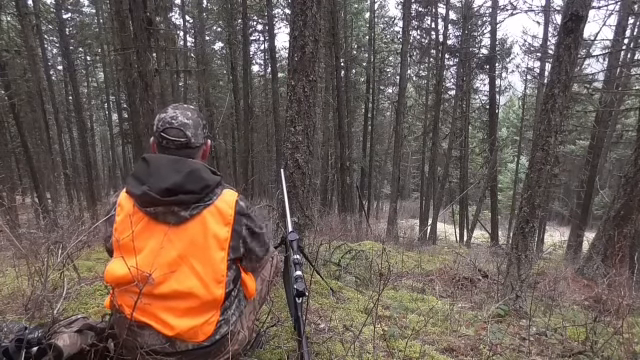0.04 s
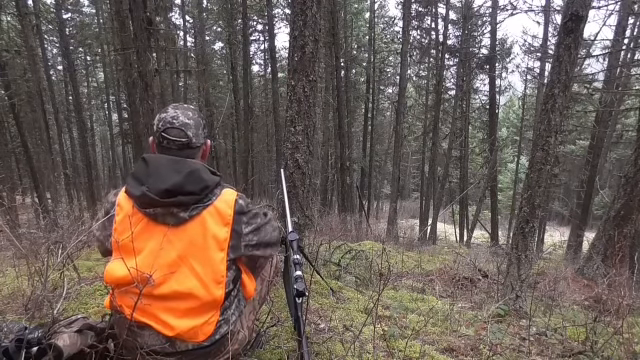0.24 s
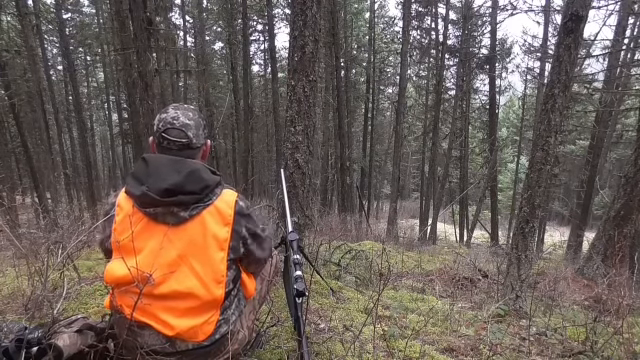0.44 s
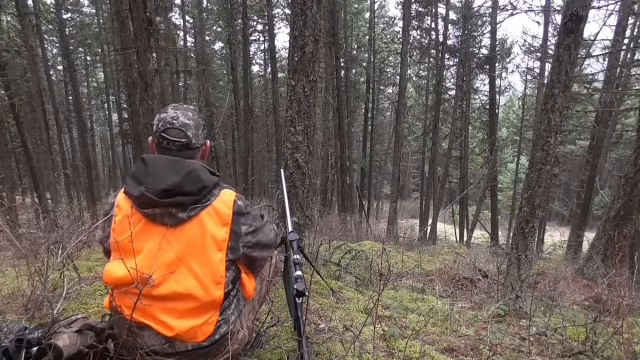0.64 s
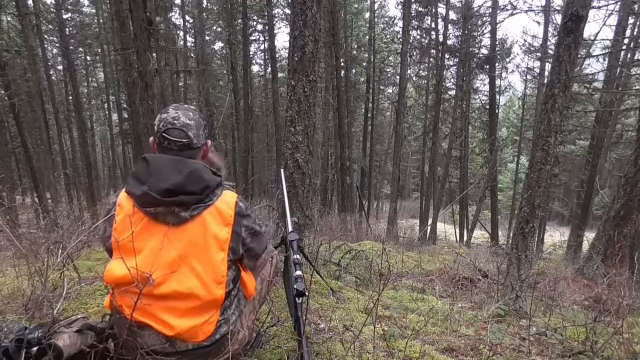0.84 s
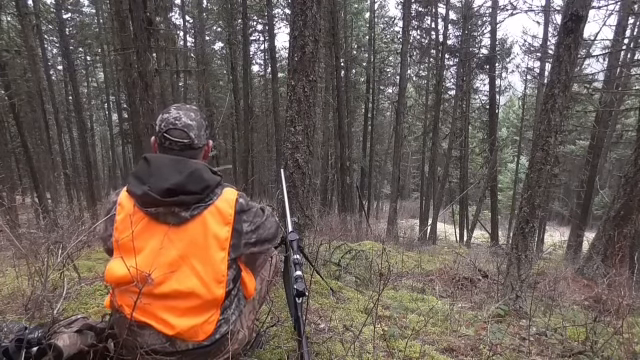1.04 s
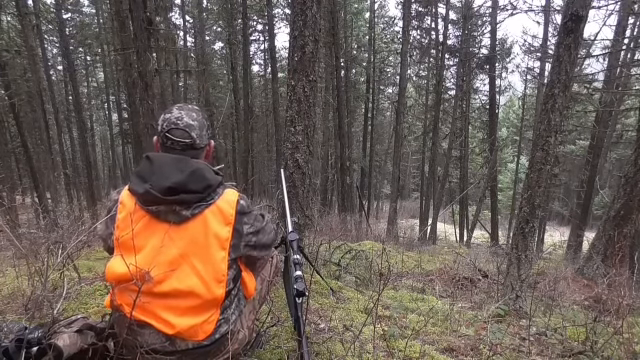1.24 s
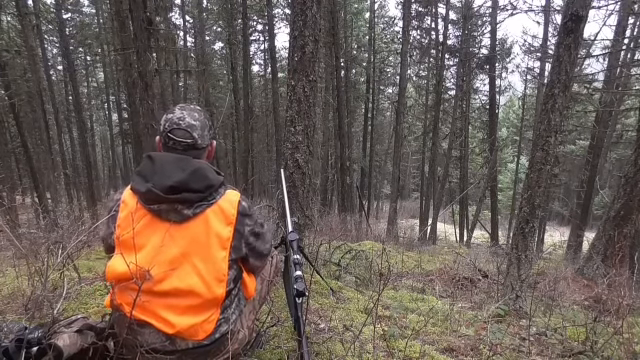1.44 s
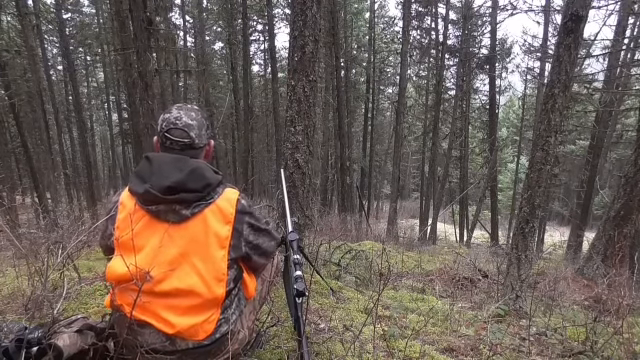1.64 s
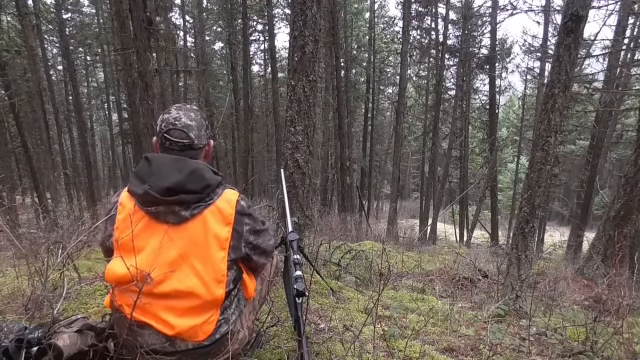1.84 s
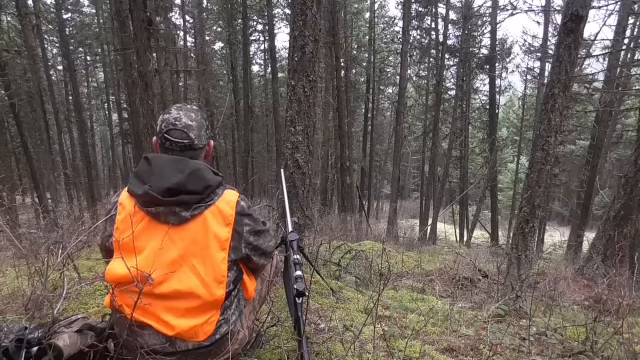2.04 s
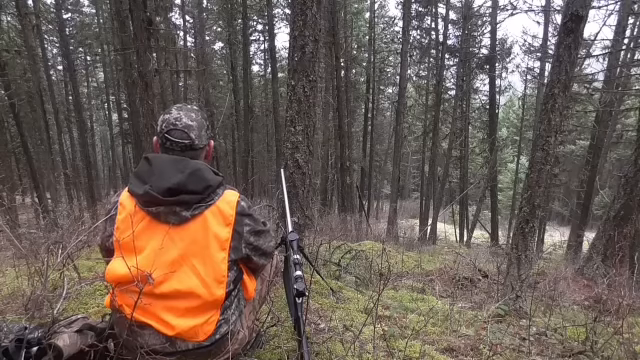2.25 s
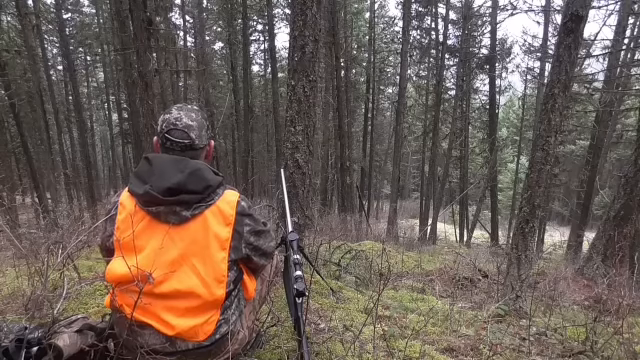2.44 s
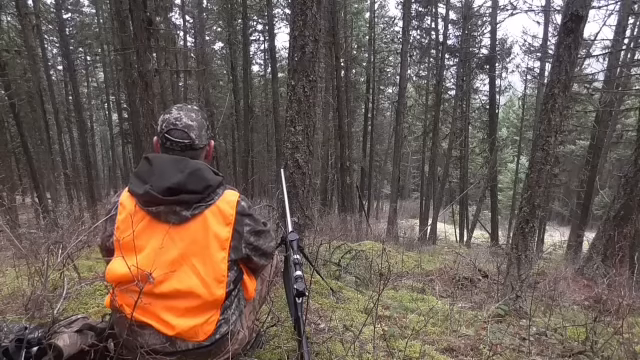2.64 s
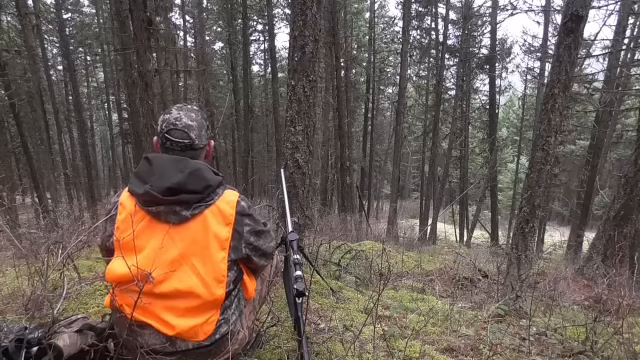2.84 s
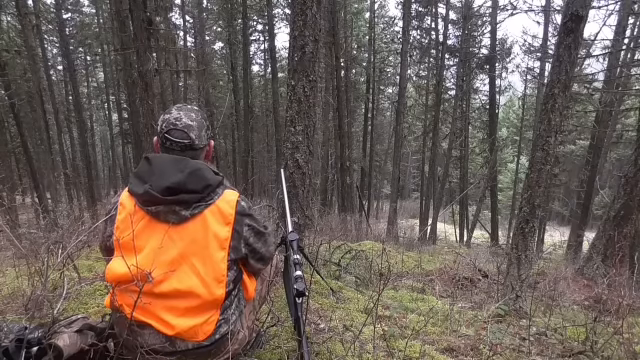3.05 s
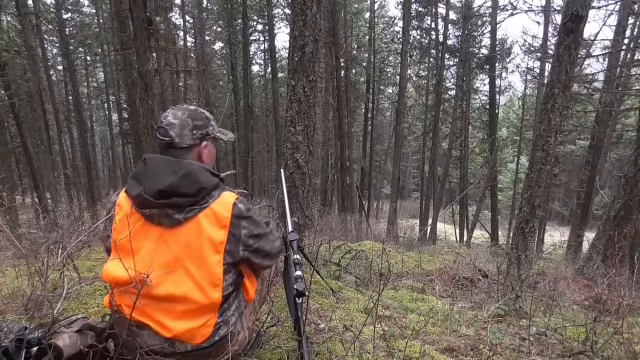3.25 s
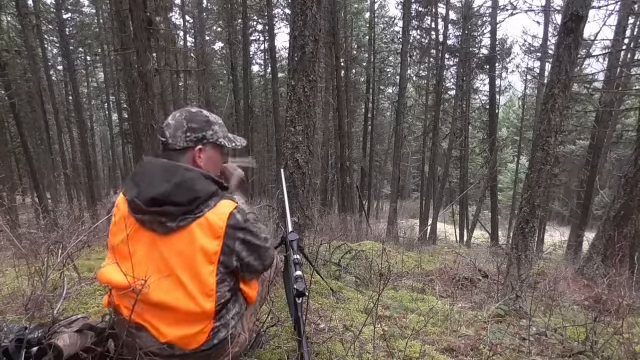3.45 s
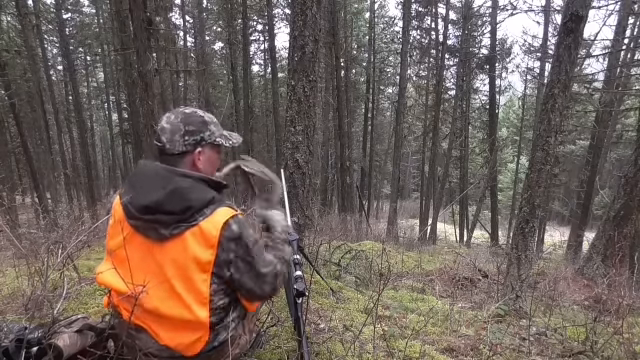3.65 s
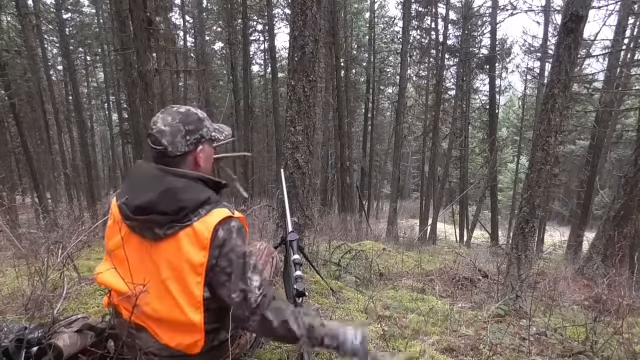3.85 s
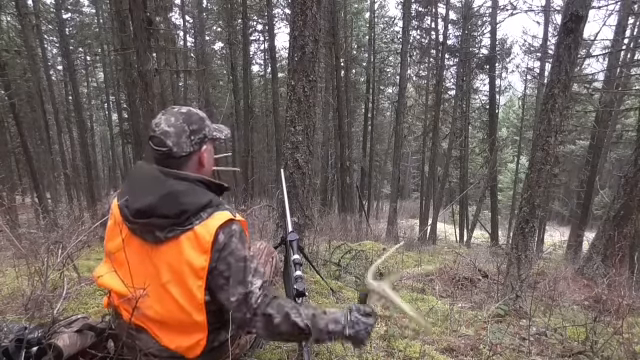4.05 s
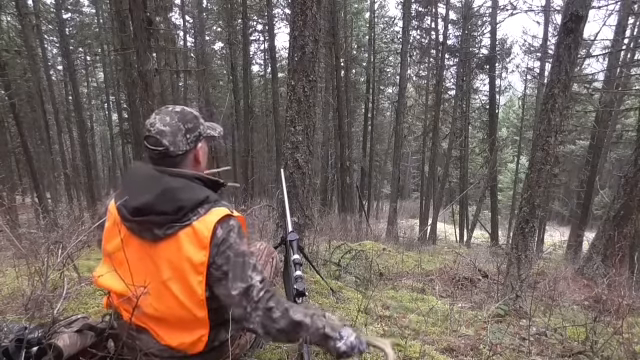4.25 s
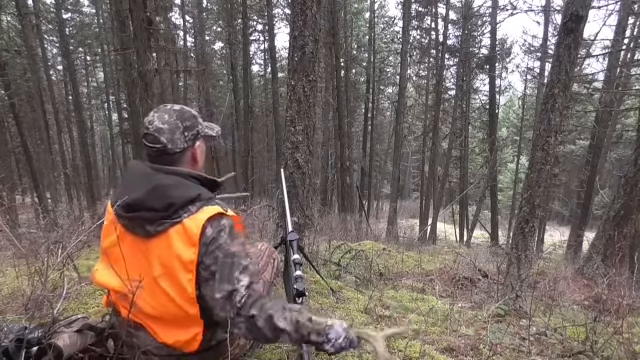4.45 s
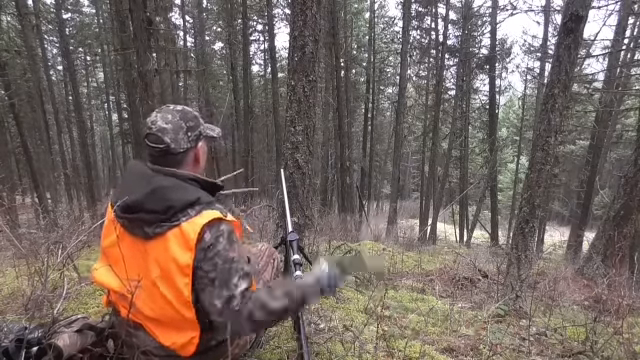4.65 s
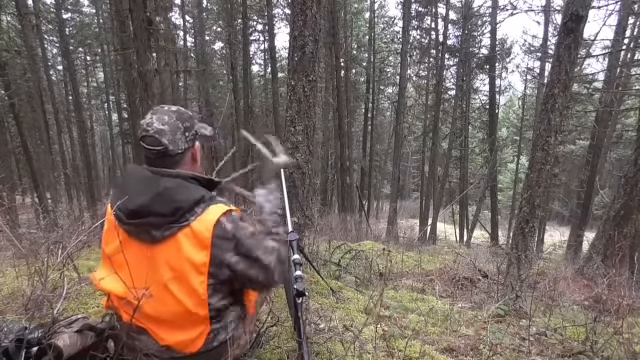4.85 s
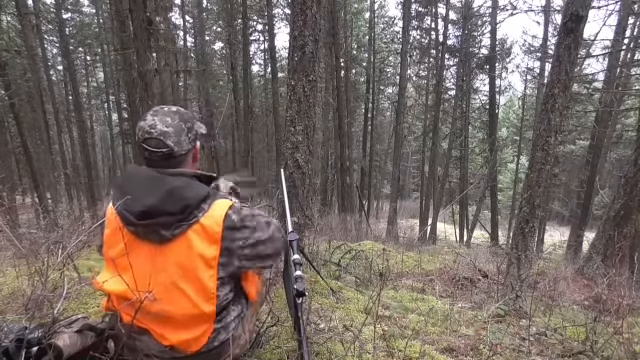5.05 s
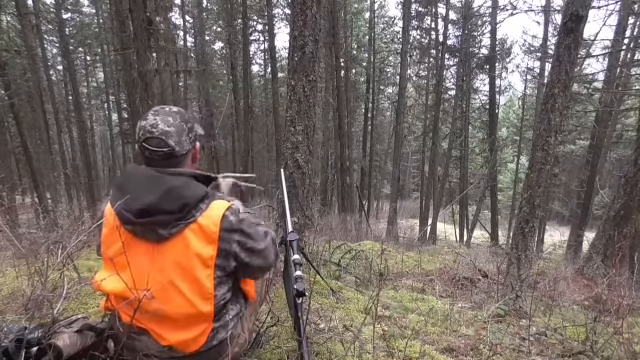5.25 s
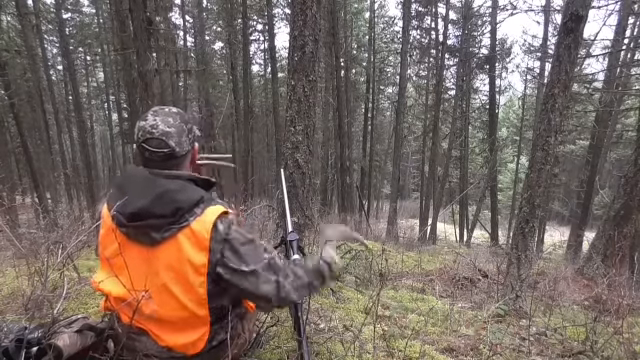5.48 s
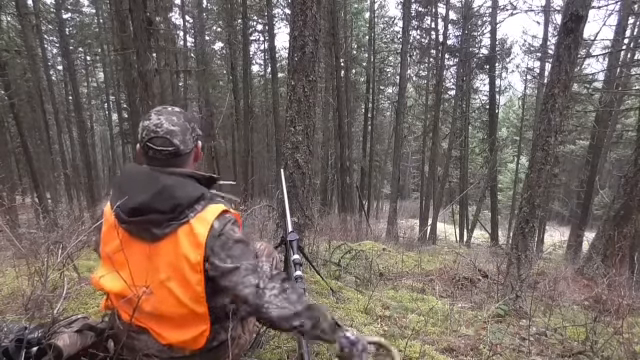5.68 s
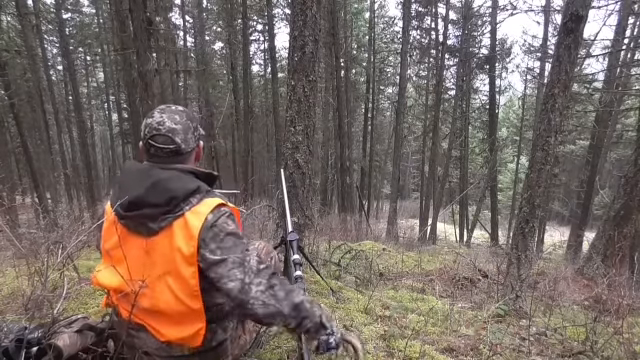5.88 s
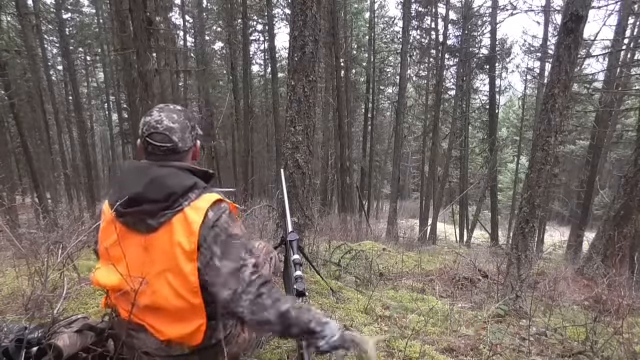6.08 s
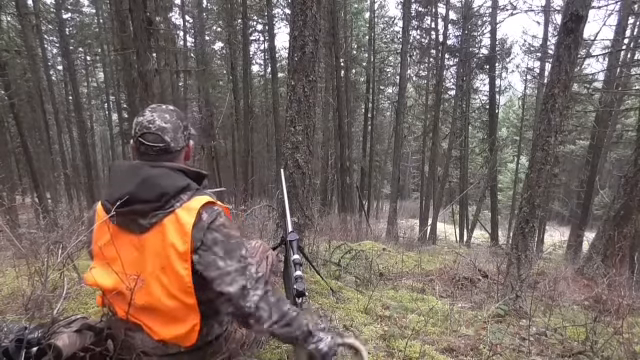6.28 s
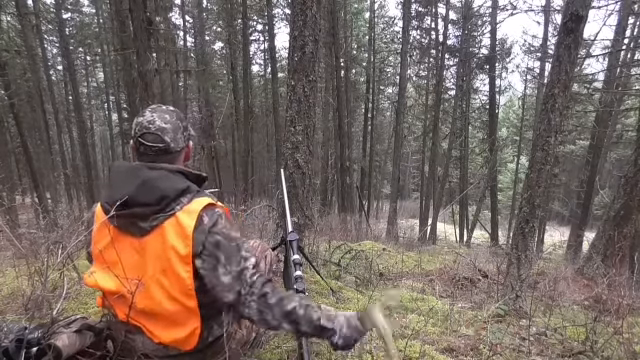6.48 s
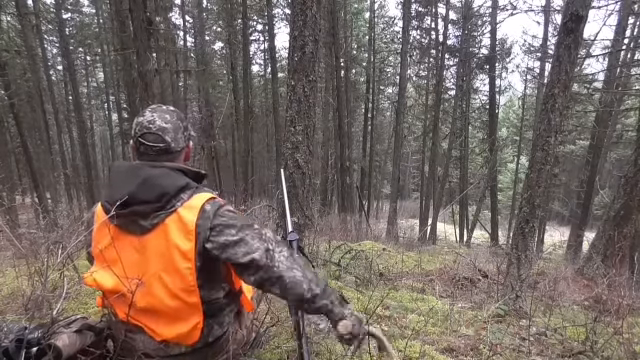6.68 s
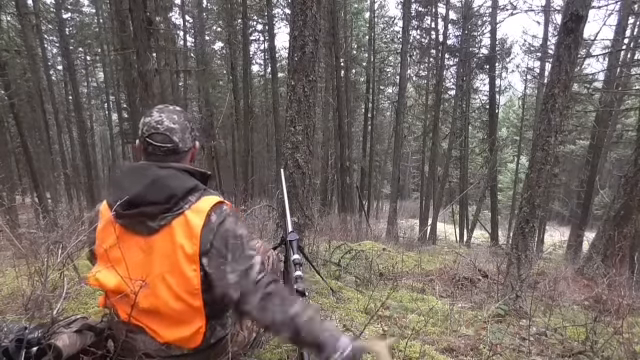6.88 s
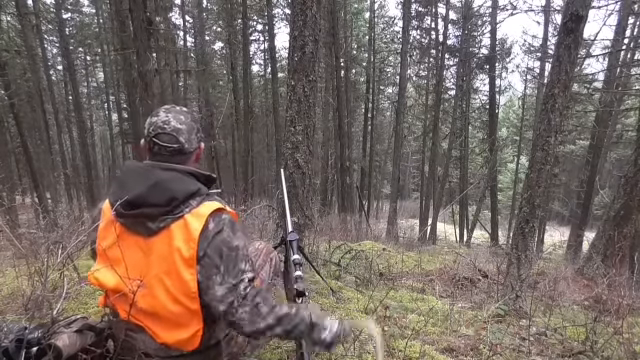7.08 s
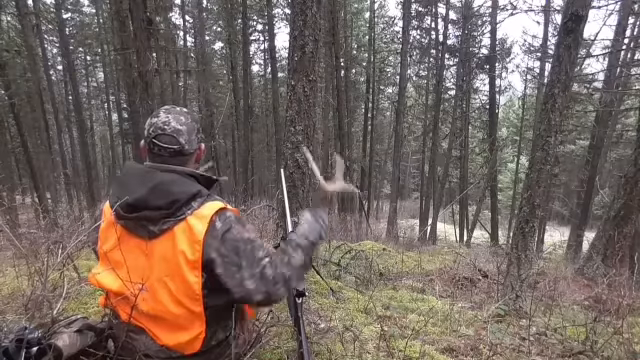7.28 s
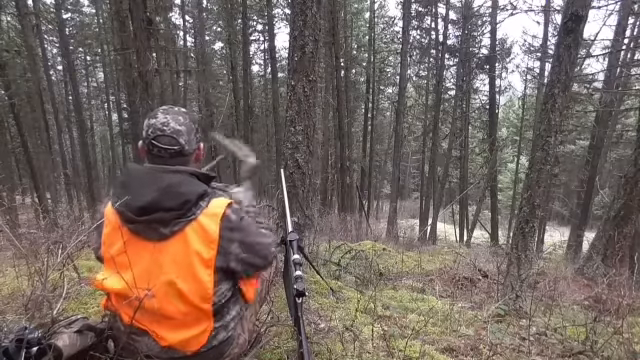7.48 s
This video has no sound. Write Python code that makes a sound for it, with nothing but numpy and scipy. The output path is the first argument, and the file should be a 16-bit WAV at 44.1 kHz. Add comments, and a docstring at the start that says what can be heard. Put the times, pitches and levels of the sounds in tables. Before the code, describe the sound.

Antlers clash in two runs of sharp clicks and knocks, then thump and rake the ground in a quiet forest.

```python
"""Antler rattling in a conifer forest

A seated hunter rattles a pair of antlers a few metres from a close-spaced stereo microphone.
Tines clash, skid and ring; between the runs one antler pounds the mossy ground, snaps dry twigs
and rakes through the litter. Trunks near and far scatter the blows back over a faint hush of air."""
import sys
import numpy as np
from scipy import signal
from scipy.fft import rfft, irfft
from scipy.io import wavfile
from scipy.ndimage import uniform_filter1d

SR = 44100
rng = np.random.default_rng(int(sys.argv[2]) if len(sys.argv) > 2 else 0)


def store_pcm(level_fs):
    """Save levels as 16-bit WAV."""
    pcm = np.round(np.clip(level_fs, -1, 1) * 32767).astype(np.int16)
    wavfile.write(sys.argv[1], SR, np.atleast_2d(pcm).T)


N = 331616

# Event levels stand before their layer's gain; skid and crunch times are scaled at each blow.
# tine on tine: t/s, level at 2.5 kHz/dB, tick over clack/dB, knock over level/dB, skid/s, rebound lag/s
TINE_CLASHES = [(0.0, -47.5, -10.5, 4.5, 0.0023, 0.00008), (0.08, -52, -7, 8, .004, 0.00041),
                (.092, -40, 4, 3, 0.0018, 0.011), (0.2568, -35, 7, -4, 0.0029, 0.025),
                (0.3297, -35, 11, -4.5, .0012, 0.01), (0.385, -48.5, -6.5, -0.5, .002, 0.004),
                (0.5123, -36, 3.5, 3, .0017, 0.00034), (0.5422, -32.5, 4.5, -8.5, .0016, 0.019),
                (0.601, -42, -12, -1, 0.002, 0), (0.6728, -49, -6.5, 2.5, 0.0011, 0.000063),
                (0.6828, -38.5, -1, 1.5, 0.005, 0.016), (0.718, -45.5, 13, -3, 0.0045, 0),
                (0.75, -44.5, -1.5, -10, 0.0052, 0), (0.8785, -36, -9, 0, .0003, 0.00089),
                (.891, -47, -10, 1.5, 0.0027, 0.00011), (.9275, -46, -8.5, -4.5, .0025, 0.0018),
                (1.0151, -40, -1.5, -8, .001, 0.0015), (1.043, -40.5, -14.5, -10, 0.0056, 0),
                (1.0717, -53.5, -6.5, 10, 0.002, 0.00039), (1.088, -29, -7, -3, .0017, 0.00034),
                (1.2494, -56, -15, 6.5, 0.001, 0.0028), (1.4039, -33, 1.5, 0.5, 0.0019, 0),
                (1.4187, -36.5, -4, 4.5, 0.0027, 0.011), (1.5864, -38.5, 1, 0.5, 0.0032, 0.025),
                (1.719, -50.5, -10, 5.5, .003, 0), (1.7298, -39.5, 6.5, -1, 0.0031, .024),
                (1.804, -37.5, 6, -9, 0.0021, 0.013), (1.92, -61, -14, 11, 0.0067, 0),
                (1.9357, -60, -17, 10.5, 0.0023, 0), (3.0908, -45, 12, 4, .0003, 0.00063),
                (3.107, -42.5, -5.5, -0.5, 0.0065, 0.00061), (3.175, -38, -3, -7, 0.0022, 0.0017),
                (3.1875, -34.5, 2.5, -4, 0.0038, 0.000067), (3.2327, -32.5, 4.5, -1, 0.0043, 0.01),
                (3.3627, -34, -2.5, -8.5, 0.0035, .011), (3.399, -40, -3.5, 3.5, 0.0016, 0.0014),
                (3.5154, -32.5, 2.5, -14.5, 0.00056, 0.00084), (3.576, -38.5, -3.5, -3.5, .002, 0.00023),
                (3.5911, -30, -1.5, -7, 0.00049, 0.019), (3.6181, -37, -4.5, -7, 0.00086, 0.019),
                (4.998, -39.5, 8, -9, .0006, 0), (5.0135, -42.5, -8, -6, .0015, 0),
                (5.0219, -28.5, -2.5, -1.5, 0.00013, 0.0095), (5.092, -43.5, -6.5, 4, .001, 0.0017),
                (5.152, -33.5, -1.5, 2.5, 0.0017, 0.0023), (5.1657, -32, -4.5, -2, 0.0023, 0),
                (5.3405, -48.5, -12, 2, .001, 0.0014), (5.3503, -37.5, 10.5, -2, 0.00039, .022),
                (5.439, -38.5, -3.5, -3, 0.0011, 0.000084), (5.4486, -39.5, 14, -3.5, 0.000386, 0.0014)]
# antler on the ground: t/s, crunch level/dB, brightness/dB, crunch/s, thud at 200 Hz/dB,
# hollow at 400 Hz over thud/dB, bounce over thud/dB
GROUND_BLOWS = [(3.9462, -41, 10.5, .0002, -20.5, -1, -22), (4.015, -52.5, 12, .0007, -37, -2.5, -16),
                (4.2582, -41.5, -7, 0.0042, -20.5, -5.5, -26), (4.4525, -53, -3.5, .002, -39, -18, -29),
                (5.6786, -34.5, -11, 0.0011, -35.5, -7, -4), (5.8102, -58, -7, 0.00074, -36.5, 1, -8),
                (6.011, -69.5, 11.5, 0.00088, -45, -8.5, -24), (6.118, -43.5, 9, 0.0013, -39.5, -9, -7.5),
                (6.3249, -57.5, 8, 0.0022, -37, -1, -17), (6.6104, -37.5, 2.5, 0.000544, -36, 1, -20),
                (6.752, -51, 5, 0.0017, -45.5, -6, -16), (6.91, -48.5, -1, 0.0013, -40, -17, -23),
                (7.0084, -47.5, -0.5, 0.0011, -33, -9.5, -5),
                (7.1882, -49.5, 14, 0.00013, -37.5, -6.5, -15)]
# square clashes jolting the hands: t/s, level at 200 Hz/dB
HAND_JOLTS = [(3.5151, -46), (3.592, -49), (5.0213, -40)]
# single twigs breaking: t/s, crunch level/dB, brightness/dB, crunch/s
TWIG_SNAPS = [(4.2706, -46.5, 9, 0.0011), (5.665, -45, 3, 0.0082), (5.8666, -55, 0, .002),
              (6.2073, -57, 3, 0.0029), (6.4662, -49, 7.5, 0.0025), (6.7333, -56.5, 6, 0.00066),
              (6.7781, -53.5, 1, 0.0032), (6.934, -55, 14, 0.00093), (7.2324, -58, 16.5, .0007),
              (6.8185, -47.5, 4.5, 0.003), (6.944, -45, 4.5, 0.001), (7.2216, -50, 15, 0.003),
              (7.2738, -69.5, 15, 0.00058)]
# strokes through grass and needles: middle t/s, length/s, swish level/dB, drag over swish/dB
RAKE_STROKES = [(3.907, 0.036, -41.5, -11.5), (4.665, 0.024, -52, 8), (5.642, 0.054, -45.5, -10),
                (5.848, 0.075, -47.5, -1), (5.945, 0.041, -55.5, 0.5), (6.16, .13, -62, 4),
                (6.3, 0.065, -54.5, 4), (6.437, 0.05, -52.5, 1.5), (6.519, 0.042, -49, -10),
                (6.726, 0.055, -52, -3), (6.845, 0.016, -43, -1.5), (6.964, 0.061, -39.5, -8),
                (7.111, 0.023, -65, -1), (7.194, 0.048, -48.5, 7), (7.429, 0.032, -62, -4)]
# the sleeve brushing as the arm works: t/s, level/dB
SLEEVE_LEVELS = [(3.3, -75), (3.8, -64.5), (4.9, -67.5), (5.5, -76), (6.4, -58), (7.3, -73.5), (7.52, -66)]
# modes of bending antlers, damped forest floor and dry sticks: f/Hz, level/dB
ANTLER_MODES = [(420, -7), (560, -2), (650, -2), (810, -4.5), (920, 1.5), (1090, -4), (1300, 2.5),
                (1430, -4), (1760, -13.5), (2100, -6), (2250, 1.5), (2690, -8.5), (3220, 6.5), (3700, 7.5),
                (4350, 3), (4700, 1.5), (5140, 4), (5600, -6.5), (6400, 0.5), (7100, 7.5), (7600, 10),
                (8400, 5), (9500, -1)]
SOIL_MODES = [(95, -10), (135, -3), (175, 3), (225, 4), (365, 4), (430, 0.5)]
TWIG_MODES = [(700, -3.5), (1000, -6), (1400, 4), (2000, -1), (4200, 5), (7600, 16.5), (8800, -39.5)]
# spectra of the blows, the rustles and the air: f/Hz, level/dB
CLASH_COLOUR = [(60, -41.5), (130, -25.5), (250, -11), (450, -1.5), (8000, 9.5), (11000, 7),
                (13500, -1.5), (16000, -14.5)]
GLANCE_COLOUR = [(9000, 2), (13500, -4), (16000, -24.5)]
THUD_COLOUR = [(25, -53.5), (60, -6), (110, 2), (280, 0), (400, 4), (540, -3.5), (750, -7),
               (1500, -19.5), (4000, -33)]
SPRING_COLOUR = [(150, -19.5), (400, -8), (900, -10.5)]
TWIG_COLOUR = [(100, -37.5), (350, -4.5), (650, -3.5), (9000, 10.5), (12500, 8), (16000, -15)]
CRACKLE_COLOUR = [(300, -18.5), (1200, -6), (9000, 11.5), (16000, -9.5)]
BUMP_COLOUR = [(40, -10), (90, -6.5), (180, 4), (400, -21), (800, -26.5)]
SWISH_COLOUR = [(2350, -25.5), (4000, -16.5), (5970, -16), (7620, -2), (8650, -5), (9830, -8.5),
                (11800, -6), (14200, -19), (16000, -32.5)]
SCRAPE_COLOUR = [(150, -4.5), (400, 4.5), (1300, -2), (2500, -10), (5000, -17), (8000, -43.5)]
AIR_COLOUR = [(15, -58.5), (25, -13), (95, -9), (111, -0.5), (273, -8), (296, -9.5), (831, -10),
              (979, -7.5), (1150, -13), (1730, -20.5), (2530, -24), (6210, -31.5), (8140, -22),
              (15200, -25.5), (16500, -52)]
# the air at the two microphone ports: f/Hz, left-right likeness
AIR_LIKENESS = [(100, .35), (300, 0.12), (800, 0.085), (1300, 0.39), (2500, .25), (8000, 0.12)]
# scatter from near trunks and from the deep forest: f/Hz, level/dB, t60/s
NEAR_ECHO = [(120, -22, 0.13), (467, -10, 0.11), (1300, -13, 0.21), (4500, -15, 0.28), (9000, -21, 0.35),
             (15070, -19, 0.13)]
FAR_ECHO = [(120, -42, .5), (251, -23.5, 0.45), (450.6, -13.5, 1), (750, -16, 1), (1300, -17, 0.79),
            (2800, -19.5, 0.84), (5000, -17, 0.54), (9000, -25.5, 1), (15000, -24.5, 0.28)]
# stereo width at the microphone: f/Hz, side over mid/dB
MIC_WIDTH = [(100, -19.5), (1000, -12.5), (4000, -11.5), (8000, -8.5), (14000, -4)]

FIRM_DB = -36  # an ordinary firm blow
LEAD_S = .03  # light touch before each contact


def contacts():
    """Each clash and the rebound of its tines: t/s, level/dB, brightness/dB, knock/dB, skid/s."""
    for s, db, bright, hollow, skid, rebound in TINE_CLASHES:
        yield s, db, bright, db + hollow, skid
        if rebound > .004:  # weaker and duller; its knock depends little on the first blow
            yield s + rebound, db - 7.5, bright - 8, -42 + .3 * (db - FIRM_DB), .0029


def antlers():
    """Hard tines strike, then chatter over each other's ridges; a glancing blow starts softer."""
    out = np.zeros((2, N))
    for s, db, bright, knock, skid in contacts():
        crack = 1.5 + .55 * bright  # dB over the clack, growing with the tick
        clack = db - crack / 2
        glancing = np.clip(skid / .0023, .01, 1)
        x = blow(ANTLER_MODES, t60=.053, hz_fall=.73, skid=skid * 2.1, catches_per_s=3000,
                 catch_size=.35, spot_db=3.5, click_db=0, blur_db=2, blur_t60=.034, detune=.038,
                 graze=.007 * glancing, graze_db=-16.5)
        x = causal(x, read(CLASH_COLOUR, bins(x)) + glancing * read(GLANCE_COLOUR, bins(x)))
        x = weigh(x, [300, 1000, 2500, 6000, 16000], [knock, clack, clack + crack, clack + bright])
        add(out, s - LEAD_S, microphone(x, left_db=-.3, scatter_s=.001))
    return amp(2.5) * out


def thuds():
    """Weight landing on the soil and bouncing once, or jolting the hands: t/s, level/dB, hollow/dB."""
    for s, _, _, crunch, db, hollow, bounce in GROUND_BLOWS:
        landing = s + .00018 + 2.6 * crunch  # once the litter is crushed
        yield landing, db, hollow
        yield landing + .028, db + bounce, -9
    for s, db in HAND_JOLTS:
        yield s, db, 5.5


def ground():
    """Soft soil takes the weight of the blow, booms for a few cycles and springs back once."""
    out = np.zeros((2, N))
    for s, db, hollow in thuds():
        # harder blows stop sooner and have less of their weight at 85 Hz
        sink_s = .0041 * amp(-1.1 * (db - FIRM_DB))
        deep = -5.5 - .36 * (db - FIRM_DB)
        x = blow(SOIL_MODES, t60=.019, hz_fall=.47, skid=sink_s, catches_per_s=1200,
                 catch_size=.43, spot_db=-1.5, click_db=11.5, blur_db=15, blur_t60=.022, detune=.085,
                 graze=sink_s * .82, graze_db=-14)
        spring = np.roll(shaped(x, SPRING_COLOUR), round(.00636 * SR))
        x = causal(x + spring, read(THUD_COLOUR, bins(x)))
        x = weigh(x, [50, 140, 280, 600], [db + deep, db, db + hollow])
        add(out, s - LEAD_S, microphone(x, left_db=-3, scatter_s=.002))
    return amp(3.5) * out


def twigs():
    """Brittle sticks and needles crunch under the antler with a woody knock."""
    out = np.zeros((2, N))
    for s, db, bright, crunch, *_ in GROUND_BLOWS + TWIG_SNAPS:
        x = blow(TWIG_MODES, t60=.011, hz_fall=.29, skid=crunch * 3.47, catches_per_s=4700,
                 catch_size=.34, spot_db=10.5, click_db=2.5, blur_db=-4.5, blur_t60=.013, detune=.11,
                 graze=crunch * .65, graze_db=-22.5)
        x = causal(x, read(TWIG_COLOUR, bins(x)))
        x = weigh(x, [600, 2000, 6000, 16000], [db + 3.5, db, db + bright])
        add(out, s - LEAD_S, microphone(x, left_db=-1.3, scatter_s=.0008))
    return amp(6.5) * out


def blow(modes, t60, hz_fall, skid, catches_per_s, catch_size, spot_db, click_db, blur_db, blur_t60,
         detune, graze, graze_db, size=8192):
    """A graze, the contact and a dying train of catches ring the modes; each spot favours others."""
    t = np.arange(size) / SR
    hz, db = np.transpose(modes)[:, :, None]
    spot, grip, polarity = rng.standard_normal((3, len(hz), 1))
    decay_db = 60 * t / t60 * (hz / 1000) ** hz_fall  # high modes die sooner
    tones = np.sign(polarity) * np.sin(2 * np.pi * hz * (1 + detune * grip) * t)
    ring = (amp(db + spot_db * spot - decay_db) * tones).sum(0)
    blur = rng.standard_normal(size) * amp(-60 * t / blur_t60)  # countless overlapping modes
    ring = ring / np.linalg.norm(ring) + amp(blur_db) * blur / np.linalg.norm(blur)
    ring[0] += amp(click_db)
    gap = abs(t - LEAD_S)
    pressure = np.where(t < LEAD_S, amp(graze_db) * np.exp(-gap / graze), np.exp(-gap / max(skid, 1 / SR)))
    force = catch_size * pressure * rng.standard_normal(size) * (rng.random(size) < catches_per_s / SR)
    force[round(LEAD_S * SR)] = 1
    return signal.fftconvolve(force, ring)[:size]


def raking():
    """The antler drags through grass and over lumpy soil while the sleeve brushes along."""
    t = np.arange(N) / SR
    swish = rustle(SWISH_COLOUR, grains_per_s=1200, spread_db=-1.5, wash=.24, clump_db=4, clump_s=.0053)
    scrape = rustle(SCRAPE_COLOUR, grains_per_s=1100, spread_db=.5, wash=.94, clump_db=6.5, clump_s=.021)
    crackle = rustle(CRACKLE_COLOUR, grains_per_s=320, spread_db=-1, wash=0, clump_db=-.5, clump_s=.033)
    bumps = rustle(BUMP_COLOUR, grains_per_s=140, spread_db=2, wash=.095, clump_db=-.5, clump_s=.012)
    drag = amp(3.5) * scrape + amp(-3) * bumps
    out = amp(np.interp(t, *np.transpose(SLEEVE_LEVELS), left=-120)) * swish
    for s, length, db, drag_db in RAKE_STROKES + settling():
        speed = np.exp(-.5 * ((t - s) / (length / 2)) ** 2)
        out += amp(db) * speed * (swish + amp(-10) * crackle + amp(drag_db) * drag)
    return microphone(out, left_db=-1.1, scatter_s=.005)


def settling(lag_s=.11, length_s=.14):
    """Needles fall back after each ground blow, as faint strokes of their own."""
    return [(s + lag_s, length_s, -75.5 + .5 * (db - FIRM_DB), 2.5)
            for s, _, _, _, db, *_ in GROUND_BLOWS]


def rustle(colour, grains_per_s, spread_db, wash, clump_db, clump_s):
    """Countless tiny stems flick past in clumps."""
    sizes = amp(spread_db * np.minimum(rng.exponential(1, N), 4)) * rng.choice([-1, 1], N)
    grains = evened(sizes * (rng.random(N) < grains_per_s / SR)) + wash * rng.standard_normal(N)
    clumps = evened(uniform_filter1d(rng.standard_normal(N), int(clump_s * SR)))
    return evened(shaped(grains * amp(clump_db * clumps), colour))


def diffused(x, width_hz, size=32):
    """Each direction hears other modes of an irregular shape, so the pitches blur in the echo."""
    drift = np.cumsum(rng.standard_normal(N)) * np.sqrt(2 * np.pi * width_hz / SR)
    return (signal.hilbert(x) * np.exp(1j * uniform_filter1d(drift, size=size))).real


def forest(x, bands, echoes_per_s, delay_s, alike):
    """Sparse echoes off the trunks; each band dies at its own speed."""
    taps = rng.standard_normal((3, SR)) * (rng.random((3, SR)) < echoes_per_s / SR)
    taps = evened(np.sqrt(alike) * taps[0] + np.sqrt(1 - alike) * taps[1:])
    hz, t, spectra = signal.stft(taps, SR, nperseg=256)
    db, t60 = read(bands, hz)[:, None], read(bands, hz, column=2)[:, None]
    spectra *= amp(db - 60 * t / t60) * np.sqrt(2 * np.log(1000) / (t60 * SR))
    tail = np.pad(signal.istft(spectra, SR, nperseg=256)[1], ((0, 0), (round(delay_s * SR), 0)))
    return signal.fftconvolve(x[None], tail, axes=1)[:, :N]


def air():
    """Distant wind in the crowns, somewhat to the right, and a thin steady hiss."""
    left, own = rng.standard_normal((2, N))
    hz = bins(left)
    alike = read(AIR_LIKENESS, hz)
    earlier = np.exp(2j * np.pi * hz * .00016)  # reaches the right port first
    right = irfft(alike * earlier * rfft(left) + np.sqrt(1 - alike ** 2) * rfft(own), N)
    return amp(-61.5) * evened(shaped(np.array([left, right]), AIR_COLOUR))


def microphone(x, left_db, scatter_s, size=1024):
    """Two close ports: alike in the bass, differently scattered in the treble."""
    paths = rng.standard_normal(size) * np.exp(-np.arange(size) / SR / scatter_s)
    side = shaped(signal.oaconvolve(x, paths / np.linalg.norm(paths))[:len(x)], MIC_WIDTH)
    return np.array([(x + side) * amp(left_db / 2), (x - side) * amp(-left_db / 2)])


def amp(db):
    """Decibels to gain."""
    return 10 ** (np.asarray(db) / 20)


def evened(x):
    """Scales to rms 1."""
    return x / np.sqrt(np.mean(x ** 2) + 1e-20)


def read(points, hz, column=1):
    """One column of a table on a log-frequency axis."""
    points = np.asarray(points, float)
    return np.interp(np.log(hz + 1), np.log(points[:, 0] + 1), points[:, column])


def add(mix, s, sound):
    """Lays a two-channel sound into the mix at time s."""
    start = round(s * SR)
    sound = sound[:, max(-start, 0):]
    part = mix[:, max(start, 0):][:, :sound.shape[1]]
    part += sound[:, :part.shape[1]]


def bins(x):
    """Frequencies of the spectrum of x."""
    return np.fft.rfftfreq(x.shape[-1], 1 / SR)


def shaped(x, points):
    """Gives x a smooth spectral colour."""
    return irfft(rfft(x) * amp(read(points, bins(x))), x.shape[-1])


def causal(x, db):
    """Colours x with nothing sounding before its attack."""
    log_gain = np.log(amp(np.r_[db, db[-2:0:-1]]))
    return irfft(rfft(x) * np.exp(np.conj(signal.hilbert(log_gain)))[:len(db)])


def weigh(x, edges_hz, levels_db):
    """Brings each band of a blow to its level, taken as rms over a hundredth of a second."""
    hz, centres = bins(x), np.sqrt(np.multiply(edges_hz[:-1], edges_hz[1:]))
    for _ in range(3):
        power = abs(rfft(x)) ** 2 * 2 / len(x) / (SR / 100)
        bands = np.array([power[(hz >= lo) & (hz < hi)].sum() for lo, hi in zip(edges_hz, edges_hz[1:])])
        gain_db = levels_db - 10 * np.log10(bands + 1e-20)
        x = causal(x, read(np.c_[centres, gain_db], hz))
    return x


def scene():
    """Antlers in front of the microphone, ground work a little right; the trees echo the antlers most."""
    clash, snap, thud, brush = antlers(), twigs(), ground(), raking()
    sharp = (clash + amp(-10) * snap).mean(0)
    knocks = shaped(sharp, [(700, 0), (1400, -30)])
    radiated = diffused(sharp - knocks, width_hz=700) + diffused(knocks, width_hz=250, size=96)
    radiated += diffused(amp(-1.5) * thud.mean(0), width_hz=98, size=160) + amp(-1) * brush.mean(0)
    near = forest(radiated, NEAR_ECHO, echoes_per_s=1500, delay_s=.012, alike=.53)
    far = forest(radiated, FAR_ECHO, echoes_per_s=2300, delay_s=.04, alike=.52)
    return clash + snap + thud + brush + near + far + air()


def record(dry, low_cut_hz=45, top_hz=16600):
    """The low cut and the band limit behind the microphone."""
    dry = signal.sosfilt(signal.butter(2, low_cut_hz, "highpass", fs=SR, output="sos"), dry)
    return signal.oaconvolve(dry, signal.firwin(255, top_hz, window=("kaiser", 9), fs=SR)[None], "same")


dry = scene()
out = record(dry)
store_pcm(out)
```